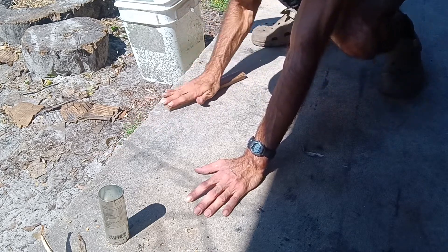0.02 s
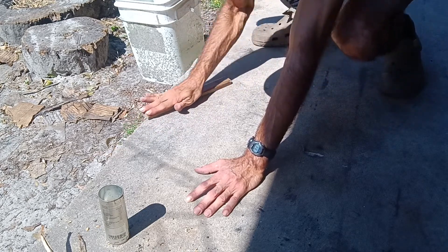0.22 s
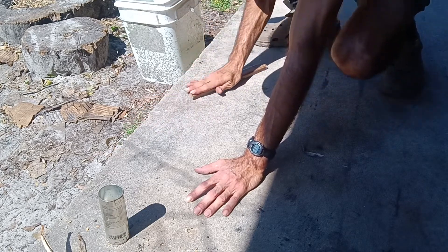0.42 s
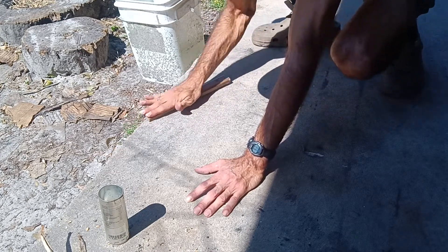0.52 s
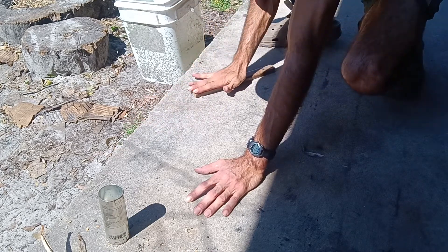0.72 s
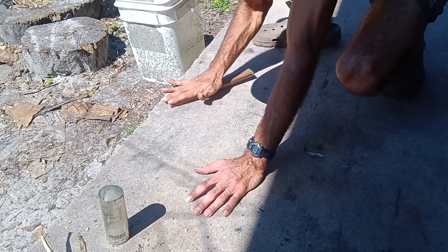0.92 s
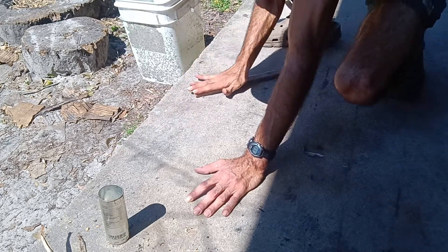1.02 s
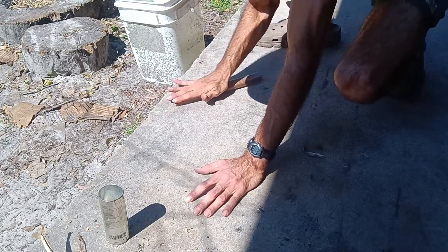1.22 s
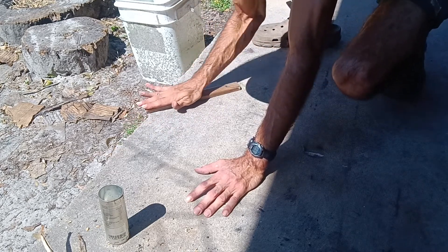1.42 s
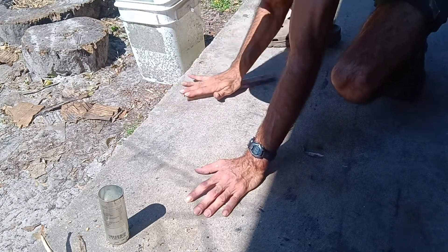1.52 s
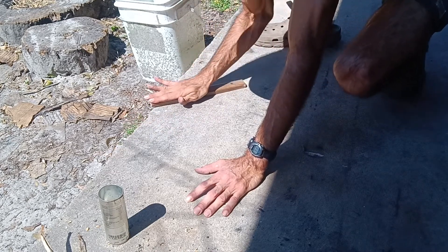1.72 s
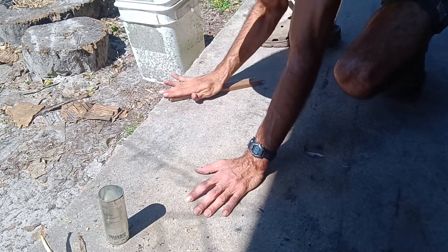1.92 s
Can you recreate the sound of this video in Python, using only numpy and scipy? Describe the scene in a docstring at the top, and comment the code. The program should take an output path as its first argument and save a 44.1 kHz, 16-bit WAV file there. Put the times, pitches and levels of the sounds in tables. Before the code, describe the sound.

A wooden board scrapes rapidly back and forth over a fibre bundle on concrete, knocking sharply.

```python
"""Board rolled over fibre on concrete

A wooden board is rolled quickly to and fro over a fibre bundle on concrete, in about ten scrapes a second.
Friction noise excites the wood and the grit; impulses excite decaying modes where the edge knocks on the slab.
Brief tones squeak where the edge sticks, and hands pressing on the slab give faint bass bumps.
A nearby wall adds a short diffuse tail, and a faint mains hum lies under the outdoor air.
"""
import sys
import numpy as np
from scipy import signal
from scipy.fft import rfft, irfft
from scipy.io import wavfile

SR = 44100
rng = np.random.default_rng(int(sys.argv[2]) if len(sys.argv) > 2 else 0)


def to_wav(s):
    """Save 16-bit WAV."""
    ch = np.atleast_2d(s).T  # columns
    pcm = np.round(np.clip(ch, -1, 1) * 32767)  # PCM
    wavfile.write(sys.argv[1], SR, pcm.astype(np.int16))


N = 88200

CHATTER_PER_S = 260  # random level knots per second
RING_SKIRT_HZ = 980  # width of the broad resonance around a ring
SPREAD, GRIT_PAN_DB = 0.68, 6  # opposed share of contact noise; left-over-right level of grit


def amp(db):
    """Level law: amplitude grows tenfold every 20 dB."""
    return 10 ** (np.asarray(db) / 20)


def unit(x):
    """Normalisation: scale the signal to a root mean square of 1."""
    return x / np.sqrt(np.mean(x ** 2))


def pan(db):
    """Level-difference stereo: left exceeds right by the given dB."""
    return amp(np.array([[db], [-db]]) / 2)


def widen(x, share):
    """Mid-side stereo: a common signal plus an opposed one."""
    return x[0] + share * x[1] * np.array([[1], [-1]])


def walk(rate):
    """Random modulation: Gaussian knots, rate per second, joined by straight lines."""
    t = np.arange(N) / SR
    return np.interp(t * rate, np.arange(4096), rng.standard_normal(4096))


def resonate(x, hz, width_hz):
    """Resonance: a second-order band-pass of gain 1 at its centre."""
    centre = min(hz, .45 * SR)
    q = max(hz / width_hz, .4)
    return signal.lfilter(*signal.iirpeak(centre, q, fs=SR), x + 1e-18)


def colour(x, points):
    """Spectral shaping: gains in dB interpolated over log frequency."""
    hz, db = np.array(points).T
    f = np.maximum(np.fft.rfftfreq(N, 1 / SR), 1)
    gain = amp(np.interp(np.log(f), np.log(hz), db))
    return irfft(rfft(x) * gain, N)


def board_modes(x):
    """Modal superposition: the upper modes of the wood respond in parallel."""
    # Each row: frequency in Hz, width in Hz, relative level in dB.
    upper_modes = [(3070, 170, -6), (3540, 223, -3), (4330, 48, -20.5), (4570, 340, -10), (5325, 240, -1.5),
                   (6220, 240, -8.5), (7200, 260, -10), (10100, 540, 0)]
    return sum(amp(db) * resonate(x, hz, width) for hz, width, db in upper_modes)


def background():
    """Broadband and tonal noise: shaped outdoor air plus the wavering hum of a mains appliance."""
    # Each row: frequency in Hz, relative level in dB.
    air_spectrum = [(20, -6), (38, -11), (55, 9.5), (75, 4.5), (130, 6), (250, 4), (500, 0), (1000, -5.5),
                    (3000, -12.5), (8000, -18), (16000, -29)]
    # Each row: frequency in Hz, mean level in dB, left-over-right level in dB.
    hum_tones = [(120.4, -57.5, -0.5), (359.5, -61.5, -6.5)]
    air_db, air_width, hum_waver_db = -63, 0.5, 2.5
    t = np.arange(N) / SR
    noise = widen(rng.standard_normal((2, N)), air_width)
    out = amp(air_db) * unit(colour(noise, air_spectrum))
    for hz, db, pan_db in hum_tones:
        level = amp(db + hum_waver_db * walk(7.7))
        out = out + level * np.sin(2 * np.pi * (hz * t + rng.random())) * pan(pan_db)
    return out


def friction(rough):
    """Stick-slip friction: sand-grain impulses over a smooth rub, with a level that chatters."""
    grains_per_s, grain_spread_db, chatter_db = 3400, 16.5, 6
    rough = np.clip(rough, 0, 1)
    grains = (rng.random((2, N)) < grains_per_s / SR) * rng.standard_normal((2, N))
    grains = unit(grains * amp(grain_spread_db * rng.random((2, N))))
    rub = rng.standard_normal((2, N))
    force = rough * grains + np.sqrt(1 - rough ** 2) * rub  # powers add to 1
    return widen(force, SPREAD) * amp(chatter_db * rough * np.tanh(walk(CHATTER_PER_S)))


def glide_ring(x, hz, width_hz):
    """Moving resonance: a one-pole filter follows the frequency; sticking and slipping even out its swing."""
    steadiness = .45  # 0 keeps the swing, 1 flattens it
    turn = np.exp(2j * np.pi * np.cumsum(hz) / SR)
    pole = np.exp(-np.pi * width_hz / SR)
    # shift the centre down to 0 Hz, filter, shift back up
    ring = signal.lfilter([1 - pole], [1, -pole], x / turn) * turn
    swing = np.abs(ring).mean(axis=0) + 1e-12
    return ring.real / swing ** steadiness


def contact(x, count=4):
    """Comb interference: waves return from the board's ends, sooner or later as the contact slides."""
    echo_gain, longest_s, slide_s, slide_per_s = .42, .0045, .00004, 24
    i, out = np.arange(N), x
    for place, sign in zip(rng.random(count), rng.choice([-1, 1], count)):
        lag = (longest_s * place + slide_s * walk(slide_per_s)) * SR
        # every echo passes through the later ones too
        out = out + sign * echo_gain * np.array([np.interp(i - lag, i, side) for side in out])
    return out


def crunch():
    """Impulsive noise: sparse coarse grains burst under the edge with random strengths."""
    bursts_per_s = 300
    bursts = (rng.random(N) < bursts_per_s / SR) * rng.standard_normal((2, N))
    return unit(widen(bursts, SPREAD))


def scrapes():
    """Friction-driven resonance: each drag swells, holds and dies as its ring glides with the contact."""
    # Each row: start in seconds, attack in seconds, hold in seconds, body level in dB, ring level in dB,
    # ring frequency in Hz, ring width in Hz, ring glide in Hz per second, rasp level in dB,
    # rasp frequency in Hz, grit level in dB, roughness from 0 to 1, left-over-right level in dB.
    # Levels are those before the swell and the stereo placing; the ring's includes its chatter.
    drags = [ (-.04, 0.013, 0.02, -49.5, -41.5, 1895, 124, 15, -38, 4350, -46, 0.32, 0),
             (0.2, 0.024, 0.071, -58.5, -40, 1838, 55, 1503, -45, 3800, -64, 0.4, 1),
             (0.306, .004, 0.028, -60.5, -56.5, 823, 60, 0, -53.5, 2320, -77, 0.14, -2.5),
             (0.37, 0.015, 0.025, -74, -35, 2140, 198, -1500, -30, 3430, -39.5, 0.58, -0.5),
             (0.478, 0.0035, .092, -48, -33, 1885, 87, 600, -39, 3670, -58.5, 0.88, 0),
             (0.597, 0.0017, 0.007, -54.5, -32.5, 1924, 60, 300, -42, 3600, -81, 0.23, 1),
             (0.667, 0.021, 0.017, -82, -44, 1960, 450, 12000, -42, 3240, -56.5, 0.99, -1),
             (0.77, 0.0087, 0.032, -67, -41.5, 1700, 224, -400, -38.5, 3550, -75, 0.82, 0.5),
             (0.819, 0.0069, 0.052, -69, -53, 1630, 150, 0, -43.5, 4860, -53, 0.56, -1),
             (0.954, 0.035, 0.023, -52, -31, 2163, 412, -500, -29, 3070, -36.5, 0.68, -1.5),
             (1.092, 0.0099, 0.05, -54, -47, 1620, 120, 0, -32, 4500, -53.5, 0.66, 1),
             (1.173, 0.0034, 0.018, -52, -36, 2206, 457, -3000, -34.5, 3270, -45.5, 0.72, -1.5),
             (1.251, 0.019, 0.028, -55.5, -45.5, 2080, 400, -5, -49, 3500, -49, 0.95, -2.5),
             (1.329, 0.0067, 0.0064, -50, -51, 2300, 505, -9, -46.5, 3080, -55.5, 0.58, -0.5),
             (1.393, 0.014, 0.016, -75, -42, 1785, 95, -15, -47, 4400, -60, 0, 1),
             (1.409, 0.036, 0.018, -56.5, -47, 1800, 250, -1000, -38, 4450, -44, 0.13, -2.5),
             (1.525, 0.043, 0.041, -60, -61, 1730, 304, 2, -43.5, 4900, -48, 0.71, -4),
             (1.676, 0.033, 0.041, -60, -41, 1900, 75, -1300, -43, 4640, -50.5, 0.8, -0.5),
             (1.802, 0.063, 0.022, -58.5, -55.5, 1890, 199, -2000, -48, 3980, -53, 0.32, -2),
             (1.949, 0.059, .03, -65.5, -52.5, 1725, 120, 0, -47.5, 4740, -49.5, 0.25, -1)]
    # Each row of these three: frequency in Hz, relative level in dB.
    body_spectrum = [(300, -59), (500, -4), (620, 4.5), (730, 7.5), (950, 17), (1250, 8.5), (1600, 18.5),
                     (2200, -51)]
    rasp_spectrum = [(1200, -39), (1800, 6), (2400, 7.5), (2750, 4), (3200, 7), (4300, 3), (5600, 9),
                     (6400, 3), (7200, -36), (10000, -7)]
    grit_spectrum = [(3500, -66), (6000, 0), (7500, 11), (8700, 3), (9900, 5), (11500, 0), (13700, -7),
                     (15000, 2), (16500, -26)]
    release_s, ring_chatter_db = 0.018, 5
    rasp_width_hz, rasp_modes_db, crunch_db = 1980, -1.5, -2.5
    swell_power, grit_speed_power = 1.37, 1.35
    out, t = np.zeros((2, N)), np.arange(N) / SR
    for (start, attack, hold, body_db, ring_db, ring_hz, ring_width, glide,
         rasp_db, rasp_hz, grit_db, rough, pan_db) in drags:
        age = t - start
        swell = np.clip(age / attack, 0, 1) ** swell_power
        speed = swell * np.exp(-np.maximum(age - attack - hold, 0) / release_s)
        force = friction(rough)

        moving_hz = ring_hz + glide * np.clip(age, 0, attack + hold)
        ring = glide_ring(resonate(force, ring_hz, RING_SKIRT_HZ), moving_hz, ring_width)
        ring = unit(ring * amp(ring_chatter_db * rough * np.tanh(walk(CHATTER_PER_S))))

        force = contact(force)
        body = unit(colour(force, body_spectrum))
        rasp = resonate(force + amp(rasp_modes_db) * board_modes(force), rasp_hz, rasp_width_hz)
        rasp = unit(colour(rasp, rasp_spectrum))
        wood = amp(body_db) * body + amp(ring_db) * ring + amp(rasp_db) * rasp

        grit = unit(colour(unit(force) + amp(crunch_db) * crunch(), grit_spectrum))
        grit = amp(grit_db) * grit * pan(GRIT_PAN_DB)
        out += (speed * wood + speed ** grit_speed_power * grit) * pan(pan_db)
    return out


def damped(hz, width_hz):
    """Free decay: one struck mode, followed for a quarter of a second."""
    t = np.arange(SR // 4) / SR
    return np.sin(2 * np.pi * hz * t) * np.exp(-np.pi * width_hz * t)


def knocks():
    """Impact excitation: the edge lands, crushes grit and rebounds once; the small board gives no bass."""
    # Each row: start in seconds, crack level in dB, crack frequency in Hz, ring level in dB,
    # ring frequency in Hz, ring width in Hz, thud level in dB, rebound delay in seconds,
    # rebound level relative to the landing in dB, left-over-right level in dB.
    # Levels are those before the low cut and the stereo placing.
    landings = [ (.174, -33.5, 5060, -47, 1497, 34.5, -58, 0.0015, -0.5, -1),
                (.262, -22, 5000, -38, 2010, 70, -60, 0.0025, -25, -2),
                (.3155, -29, 2480, -37.5, 1830, 70, -49, 0.00211, -6, 5.5),
                (.3857, -12.5, 5600, -21.5, 1972, 59, -55, .0098, -9, 4),
                (.4759, -11.5, 2650, -16, 1884, 51, -31, .00262, -14, 2.5),
                (.5325, -20.5, 4060, -26.5, 1720, 130, -66, 0.0038, 1, 1),
                (.6015, -24.5, 3860, -20, 2027, 141, -54, .001, -22, 0),
                (.6865, -24, 5340, -28.5, 2340, 260, -67, 0.0083, 4, -1),
                (.7775, -11.5, 3440, -24.5, 1612, 83, -65, 0.0021, -5, .5),
                (1.0975, -5.5, 5140, -33.5, 1566, 60, -50.5, .00148, -33, -3.5),
                (1.336, -29, 2920, -35.5, 1594, 35, -56, 0.00081, -29, -3.5),
                (1.817, -57, 2200, -65, 1810, 70, -53.5, .007, -10, 4)]
    # Low modes of the board. Each row: frequency in Hz, width in Hz, relative level in dB.
    low_modes = [(608, 30, -4), (900, 140, -6), (1010, 100, 3), (1300, 200, 1)]
    clatter_s, clatter_db = 0.001, -19.5
    crack_q, crack_top_ratio, modes_db = 1.57, 1.34, 21
    # crushed grit relative to the crack: weaker in a duller knock
    snap_hz, snap_width_hz, snap_base_db, snap_db_per_octave = 11600, 2000, -4.5, 12
    low_cut_hz = 630
    out = np.zeros((2, N))
    thud = sum(amp(db) * damped(hz, width) for hz, width, db in low_modes)
    t = np.arange(len(thud)) / SR
    for (start, crack_db, crack_hz, ring_db, ring_hz, ring_width,
         thud_db, rebound, rebound_db, pan_db) in landings:
        # an impulse with a brief noisy clatter
        push = amp(clatter_db) * widen(rng.standard_normal((2, len(t))), SPREAD) * np.exp(-t / clatter_s)
        push[:, 0] += 1

        crack = resonate(resonate(push, crack_hz, crack_hz / crack_q), crack_hz, crack_hz)
        crack = crack + amp(modes_db) * board_modes(crack)
        top_hz = min(crack_top_ratio * crack_hz, .45 * SR)
        crack = signal.lfilter(*signal.butter(2, top_hz, fs=SR), crack)

        snap = resonate(push, snap_hz, snap_width_hz)
        snap = snap / np.abs(snap).max() * pan(GRIT_PAN_DB)
        snap_db = snap_base_db + snap_db_per_octave * np.log2(crack_hz / snap_hz)
        crack = crack / np.abs(crack).max() + amp(snap_db) * snap

        ring = resonate(damped(ring_hz, ring_width), ring_hz, RING_SKIRT_HZ)
        hit = (amp(crack_db) * crack + amp(ring_db) * ring + amp(thud_db) * thud) * pan(pan_db)
        for when, gain in ((start, 1), (start + rebound, amp(rebound_db))):
            i = int(when * SR)
            out[:, i:i + len(t)] += gain * hit[:, :N - i]
    low_cut = signal.butter(4, low_cut_hz, "high", fs=SR, output="sos")
    return signal.sosfilt(low_cut, out + 1e-18)


def squeaks():
    """Stick-slip oscillation: the edge catches and one mode sings briefly, slightly unsteady in pitch."""
    # Each row: middle in seconds, time from the middle to 1/e in seconds, mean frequency in Hz,
    # level in dB (root mean square of the tone at its height).
    catches = [(0.1754, 0.0017, 5380, -29.5), (0.182, 0.0097, 3600, -47.5), (0.287, 0.0025, 1950, -33.5),
               (0.2984, 0.0022, 1950, -34), (0.375, 0.0023, 2130, -35), (.398, 0.0086, 3400, -30.5),
               (1.015, 0.016, 3533, -35.5), (1.1755, .002, 2400, -38), (1.186, 0.0033, 3220, -28),
               (1.1897, 0.0036, 2350, -35), (1.279, 0.0012, 2400, -28), (1.295, .002, 2520, -37.5),
               (1.605, 0.0071, 3620, -44.5), (1.626, 0.0074, 3300, -48.5), (1.891, 0.0026, 3250, -42)]
    waver_hz, waver_per_s = 72.4, 280
    t, out = np.arange(N) / SR, np.zeros(N)
    for when, length, hz, db in catches:
        moving_hz = hz + waver_hz * walk(waver_per_s)
        tone = unit(np.sin(2 * np.pi * np.cumsum(moving_hz) / SR))
        out += amp(db) * np.exp(-((t - when) / length) ** 2) * tone
    return out


def bumps():
    """Low-frequency pulses: dull, faint swells of bass from the hands pressing on the slab."""
    # Each row: middle in seconds, level in dB.
    presses = [(.78, -61), (1.07, -60), (1.18, -53.5), (1.53, -54), (1.84, -58)]
    bump_hz, bump_s = 62, 0.011  # bump_s runs from the middle to 1/e
    t, out = np.arange(N) / SR, np.zeros(N)
    for when, db in presses:
        tone = np.sin(2 * np.pi * (bump_hz * t + rng.random()))
        out += amp(db) * np.exp(-((t - when) / bump_s) ** 2) * tone
    return out


def delay_left(x):
    """Interaural delay: the left side hears a board slightly to the right a moment later."""
    lag_s = .00004
    turn = np.exp(-2j * np.pi * np.fft.rfftfreq(N, 1 / SR) * lag_s)
    return np.array([irfft(rfft(x[0]) * turn, N), x[1]])


def wall_echo(direct):
    """Diffuse reflection: wall and slab scatter a short, exponentially decaying noise tail."""
    t60_s, gap_s, wall_db = 0.11, .005, -11
    t = np.arange(N) / SR
    tail = rng.standard_normal((2, N)) * np.exp(-np.log(1000) * t / t60_s) * (t > gap_s)
    tail /= np.sqrt(np.sum(tail ** 2, axis=1, keepdims=True))
    return amp(wall_db) * signal.fftconvolve(direct, tail, axes=1)[:, :N]


def scene():
    """Superposition: the board's direct sound and its echo add to the bumps and the background."""
    direct = delay_left(scrapes() + knocks() + squeaks())
    return direct + wall_echo(direct) + bumps() + background()


def record(dry):
    """Band limiting: a steep elliptic low-pass cuts the top."""
    top_hz = 16000
    return signal.sosfilt(signal.ellip(8, .2, 70, top_hz, fs=SR, output="sos"), dry)


dry = scene()
out = record(dry)
to_wav(out)
```